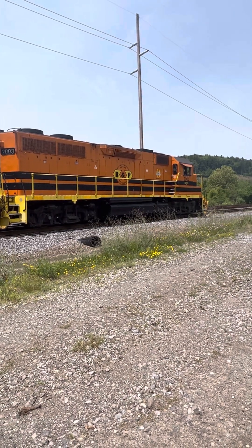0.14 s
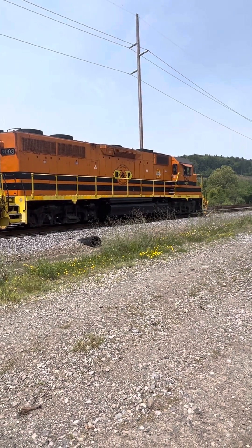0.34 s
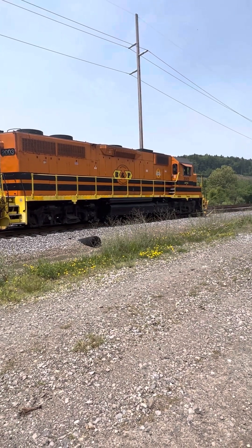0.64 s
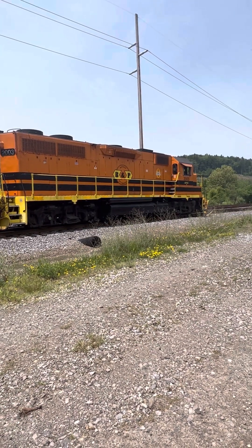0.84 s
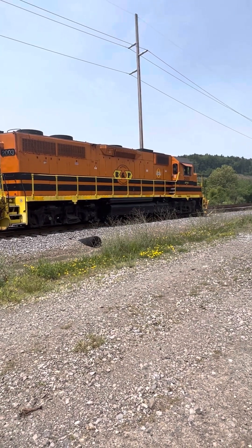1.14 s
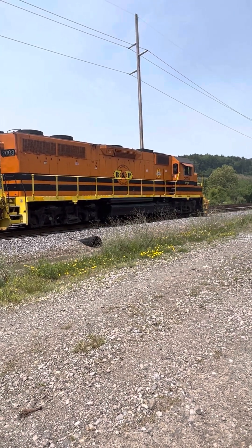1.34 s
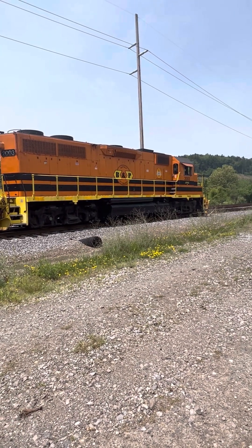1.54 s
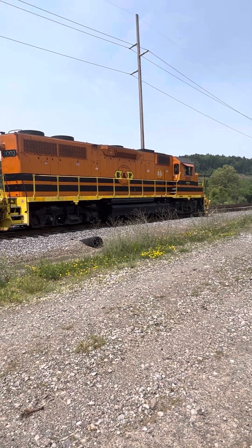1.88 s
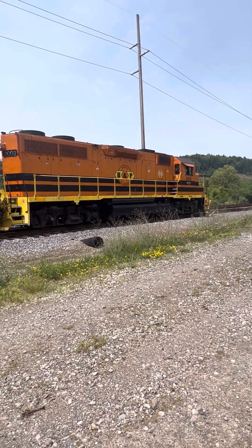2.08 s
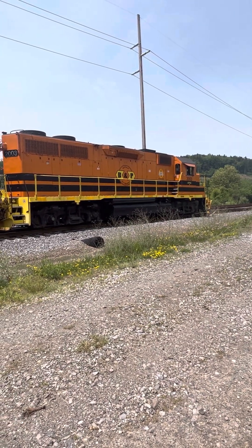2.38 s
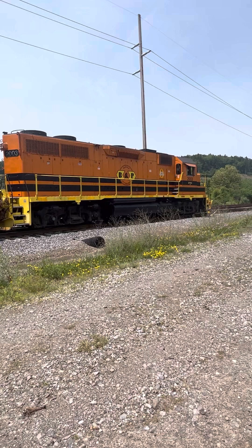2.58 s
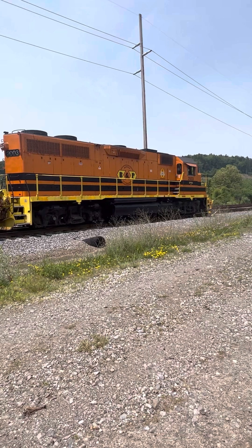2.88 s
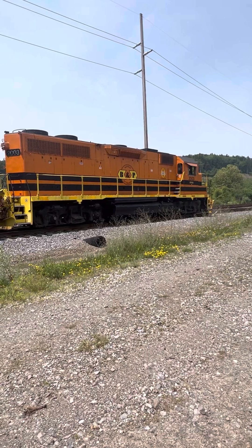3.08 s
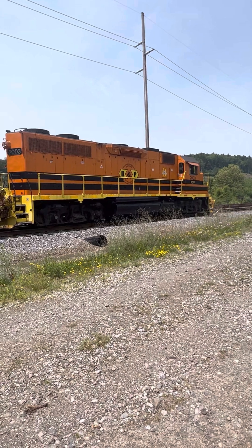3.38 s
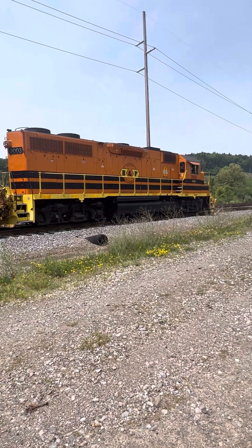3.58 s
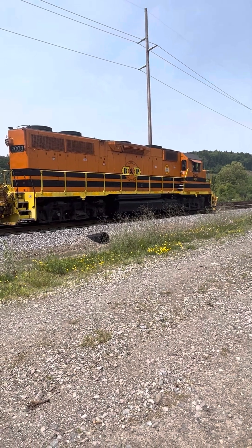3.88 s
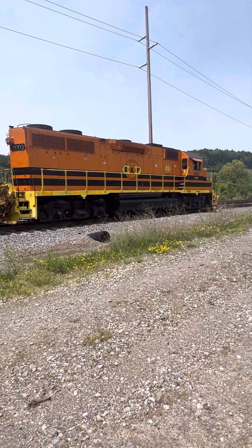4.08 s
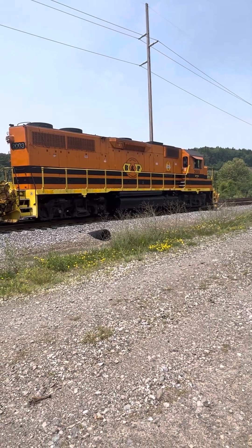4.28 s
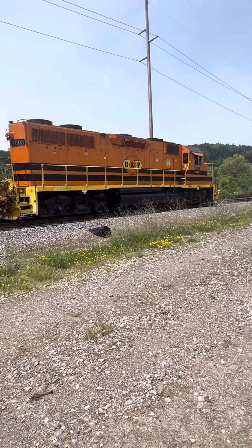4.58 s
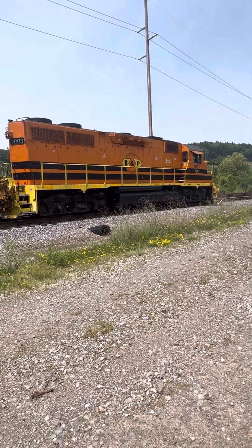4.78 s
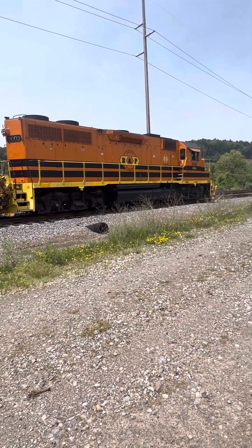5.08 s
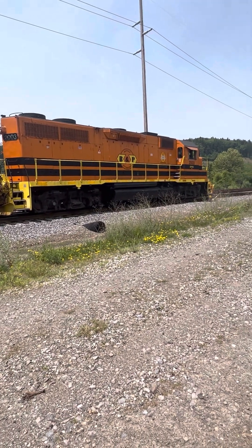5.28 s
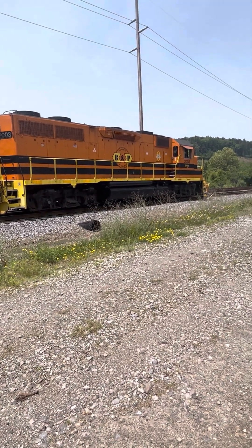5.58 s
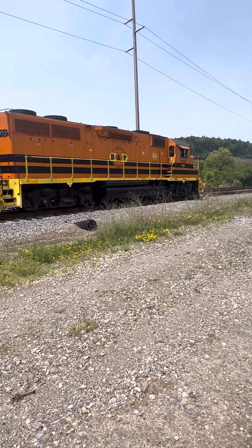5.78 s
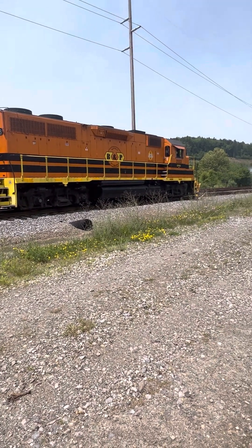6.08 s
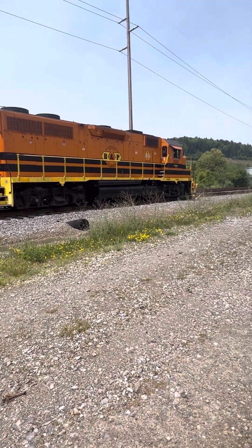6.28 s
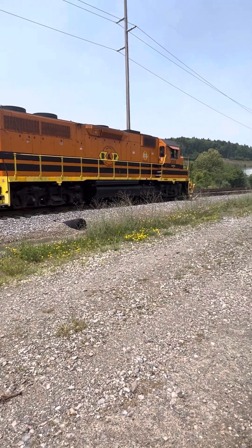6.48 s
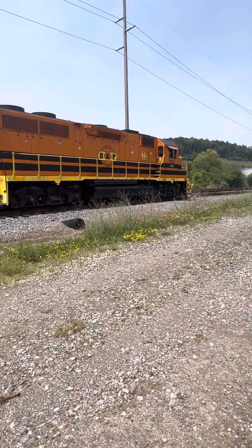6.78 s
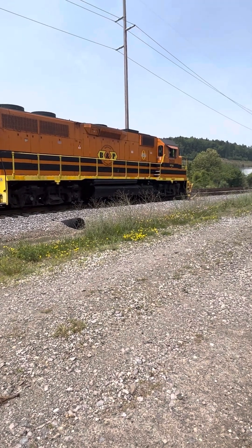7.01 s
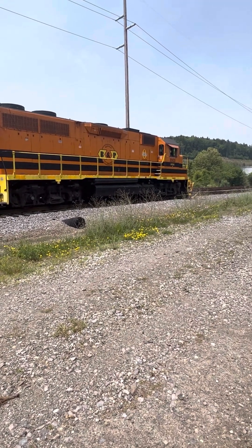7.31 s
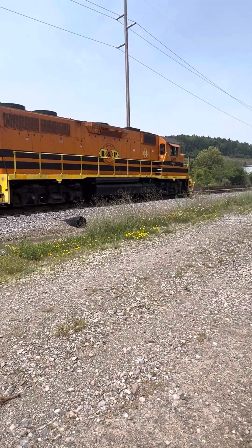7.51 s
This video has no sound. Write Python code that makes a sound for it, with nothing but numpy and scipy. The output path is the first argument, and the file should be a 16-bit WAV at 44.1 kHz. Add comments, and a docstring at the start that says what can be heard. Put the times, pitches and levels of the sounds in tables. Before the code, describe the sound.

Steady idle of a heavy railway engine in the open air, picked up by a small handheld stereo microphone. Low throbbing rumble and muffled knocking form a quick, uneven, looping pattern; gear tones hum above, panels rattle, fans hiss, and a small motor whines faintly. Around 4.9 seconds something bumps the microphone twice in quick succession, short and clicky. Afterwards the same idle goes on, chuffs easing slightly, with a faint squeal on top.

```python
"""Idling two-stroke diesel locomotive

Sixteen cylinders fire once a turn into the exhaust, unevenly, so the rumble throbs in a repeating pattern.
Shaped noise makes the block knock, hood rattle, air rumble and fan hiss; sine waves make the gears,
machines, squeal and a motor's whines. Something taps the microphone's casing twice, the second time
after a light touch: short clicks with a bending tone."""
import sys
import numpy as np
from scipy.fft import rfft, irfft, next_fast_len
from scipy.io import wavfile
from scipy.ndimage import map_coordinates

SR = 44100
rng = np.random.default_rng(int(sys.argv[2]) if len(sys.argv) > 2 else 0)


def waveform_to_disk(signal):
    """Save audio, clipped to [-1, 1], as 16-bit WAV at the path in sys.argv[1]."""
    frames = np.transpose(np.atleast_2d(signal))
    scaled = np.clip(frames, -1, 1) * 32767
    samples = np.round(scaled).astype(np.int16)
    wavfile.write(sys.argv[1], SR, samples)


N = 337365
TIME_S = np.arange(N) / SR
SHAFT_HZ = 3.7718  # average crankshaft turns a second


def amp(db):
    """Turn decibels into a plain multiplier."""
    return 10 ** (np.asarray(db) / 20)


def unit(x):
    """Scale a sound to an rms of 1."""
    return x / np.sqrt(np.mean(x ** 2) + 1e-20)


def along(points, hz):
    """Read a curve of (f/Hz, value) points on a log frequency axis."""
    f, value = np.transpose(points)
    return np.interp(np.log(hz + 1), np.log(f + 1), value)


def over_time(points):
    """Read a curve of (t/s, value) points at every sample."""
    return np.interp(TIME_S, *np.transpose(points))


def wobble(rate):
    """A smooth random curve with this many random knots a second."""
    coarse = np.arange(0, N + 32, 32)  # every 32nd sample is enough
    knots = rng.standard_normal(int(N * rate / SR) + 4)
    curve = map_coordinates(knots, [coarse * rate / SR])
    return np.interp(np.arange(N), coarse, curve)


def noise_pair():
    """Two unrelated white noises."""
    return rng.standard_normal((2, N))


def filtered(x, response):
    """Multiply the spectrum of x by a response, which may also shift phase."""
    m = next_fast_len(N + SR // 2)
    return irfft(rfft(x, m) * response(np.fft.rfftfreq(m, 1 / SR)), m)[..., :N]


def ports(hz):
    """The two microphone ports hear each frequency at different levels and moments."""
    # left level above right: f/Hz, level/dB
    lean = [(60, 0), (200, -1.5), (400, -2), (600, -5), (760, -4.5), (900, -1.6), (1800, -1.5),
            (2400, -0.5), (3200, 4), (3900, 1.5), (5500, 0), (7000, 0.5), (9000, 0)]
    # how far left leads right: f/Hz, phase/rad
    lead = [(30, -0.06), (70, 0), (150, 0), (500, 0), (950, 0.38), (1500, 0), (2300, 0), (3000, 1),
            (3700, 0.1), (4300, -1.5), (4800, -3), (5400, -4.5), (7000, -7), (8800, -6.5), (9700, -7.5),
            (11700, -12.5)]
    half = amp(along(lean, hz) / 2) * np.exp(.5j * along(lead, hz))
    return np.array([half, 1 / half])


def spread(pair, spectrum):
    """Colour two unrelated noises and mix them so left and right are partly alike; rms 1."""
    # left-right likeness: f/Hz, correlation (1 = the same)
    likeness = [(30, .995), (60, 1), (120, 0.99), (200, .99), (300, 1), (500, 0.95), (620, 0.97),
                (760, 0.93), (900, 0.96), (1200, 0.94), (2050, 0.99), (2500, .43), (3400, .2), (4000, .55),
                (4500, 0.17), (6500, 1), (8500, 0.54)]

    def mid_and_side(hz):
        turn = np.arccos(np.clip(along(likeness, hz), -1, 1)) / 2
        return amp(along(spectrum, hz)) * [np.cos(turn), np.sin(turn)]

    mid, side = filtered(pair, mid_and_side)
    return unit(np.array([mid + side, mid - side]))


def crank():
    """Turns of the shaft so far; the governor lets it run a little early or late."""
    return SHAFT_HZ * (TIME_S + .0003 * wobble(1))


def by_angle(turns, throb):
    """A level in dB that swells a whole number of times per turn."""
    return sum(db * np.cos(count * np.radians(turns * 360 - deg)) for count, db, deg in throb)


def sine_line(cycles, db, waver_db, rate):
    """A sine of rms level db that starts anywhere in its cycle and wavers in loudness."""
    level = np.sqrt(2) * amp(db + waver_db * wobble(rate))
    return level * np.sin(2 * np.pi * (cycles + rng.random()))


def air_rumble():
    """Turbulent air makes a low, random rumble."""
    # tone colour of air and frame: f/Hz, relative level/dB
    colour = [(10, -120), (18, -31), (28, -20), (42, -8.5), (60, -4.5), (85, -1), (107, 3), (130, -11.5),
              (190, -11.5), (240, -10.5), (330, -27), (500, -120)]
    return amp(-34.5) * spread(noise_pair(), colour)


def fan_hiss(turns):
    """Fans hiss as broad noise, swelling with the valve gear and flickering at random."""
    # tone colour: f/Hz, relative level/dB
    colour = [(1180, -31), (2000, -4.5), (3540, -16), (3990, -17), (4330, -16), (4430, -18), (5030, -22.5),
              (5980, -21.5), (7650, -25), (9510, -37), (10400, -35.5), (11200, -35), (12000, -50.5),
              (15600, -89.5), (22000, -120)]
    # swells per turn, depth/dB, crank angle of a crest/deg
    throb = [(2, .6, 62), (3, .35, 100), (4, .4, 70)]
    swell = amp(by_angle(turns, throb) + 0.67 * wobble(8) + 0.64 * wobble(40))
    return amp(-51) * spread(noise_pair() * swell, colour)


def late_hiss():
    """A thin band of noise joins late and then stays."""
    # tone colour: f/Hz, relative level/dB
    colour = [(4000, -40), (4600, 1), (5600, -3.5), (6600, 0), (7900, -5), (8700, -12), (9300, -50.5)]
    start_s, rise_s = 4.9, .25
    fade_in = np.clip((TIME_S - start_s) / rise_s, 0, 1)
    hiss = unit(filtered(noise_pair(), lambda hz: amp(along(colour, hz))))
    return amp(-66.5) * fade_in * hiss


def taps():
    """A dry click, and the casing flexes: one port is pushed as the other is pulled."""
    # t/s, click level/dB, click f/Hz, click time to fall 60 dB/s, noise per unit of tone,
    # flex level/dB, flex time to fall 60 dB/s (levels ahead of the soft onsets and the click filter)
    contacts = [(4.8784, -13.5, 2500, .0018, .4, -12.5, .016), (4.9088, -32, 3200, .003, 1, -34, .015),
                (4.9132, -32, 3600, .007, 3.5, -10, .028)]
    flex_hz = 510  # pitch the bend settles to
    click_lag_s = .00009  # the click reaches the left port later
    clicks, flex, t = np.zeros((2, N)), np.zeros(N), np.arange(SR // 25) / SR
    for s, db, hz, t60, crack, flex_db, flex_t60 in contacts:
        here = slice(round(s * SR), round(s * SR) + len(t))
        snap = np.sin(2 * np.pi * hz * t) + crack * rng.standard_normal((2, len(t)))
        clicks[:, here] += amp(db - 60 * t / t60) * (1 - np.exp(-t / .0002)) * snap
        # high bending waves arrive first, so the pitch starts high
        cycles = flex_hz * t + 1.5 * (1 - np.exp(-t / .0009))
        onset = 1 - np.exp(-(t / .0013) ** 2)
        flex[here] += amp(flex_db - 60 * t / flex_t60) * onset * np.sin(2 * np.pi * cycles)

    def click_path(hz):
        delay = np.exp(-2j * np.pi * hz * [[click_lag_s], [0]])
        return delay / (1 + 1j * hz / 4500) ** 2 / (1 + (hz / 10500) ** 8)

    return filtered(clicks, click_path) + flex * [[1], [-1]]


def motor():
    """The tone drifts with the motor's speed; switching mirrors it around the switching rate."""
    # a small switched motor, out of step at the two ports: t/s, tone f/Hz
    speed = [(0, 828.8), (.9, 829.3), (1.6, 827.3), (2.4, 828), (3.3, 831.8), (4, 833), (4.8, 829.8),
             (6, 831.7), (6.8, 827.2), (7.2, 826.3), (7.65, 827)]
    # multiple of the switching rate, multiple of the tone, left rms level/dB, right rms level/dB,
    # phase that left leads/rad (levels waver around these)
    whines = [(1, -1, -61.4, -71.4, -.6), (1, 1, -73, -71.5, -.7), (1, 3, -80, -82, -.7),
              (2, -1, -87, -85, -1.2), (2, 1, -95, -94, -2.1)]
    switch_hz = 5018.3
    start_db, creep_db_per_s = -47.5, .27  # the tone slowly grows louder
    tone = 2 * np.pi * np.cumsum(over_time(speed)) / SR
    tone_db = start_db + creep_db_per_s * TIME_S + 1.5 * wobble(20) + 2.2 * wobble(60)
    out = amp(tone_db) * np.sin(tone) * [[1], [-1]]
    for switch, side, left_db, right_db, lead in whines:
        phase = 2 * np.pi * switch * switch_hz * TIME_S + side * tone + .3 * wobble(40)
        whine_db = np.array([[left_db], [right_db]]) + 1.8 * wobble(30) + .4 * wobble(4)
        out = out + amp(whine_db) * np.sin([phase + lead, phase])
    return np.sqrt(2) * out  # sine peak from rms


def squeal():
    """Faint high sines with unsteady pitch; they come up late, then ease a little."""
    # f/Hz, rms level/dB ahead of the level curve
    pitches = [(6069, -82.5), (6497.5, -77), (6933, -81.5), (8087, -90)]
    # t/s, added level/dB
    loudness = [(0, -13), (2.8, -10), (6.4, -1.5), (7.65, -5)]
    lines = sum(sine_line(hz * TIME_S + 0.23 * wobble(6.5), db, waver_db=2.5, rate=4)
                for hz, db in pitches)
    return amp(over_time(loudness)) * lines


def machines():
    """Machines off the shaft hum as sines at their own fixed pitches."""
    # f/Hz, rms level/dB around which each wavers
    hums = [(39.7, -56), (61.63, -43), (77.06, -43), (86.05, -50), (106.8, -43), (142.4, -51), (224.3, -51),
            (257.8, -56)]
    return sum(sine_line(hz * TIME_S, db, waver_db=1.2, rate=1) for hz, db in hums)


def shaft_tones(turns):
    """Sines at whole multiples of the shaft speed: gear tones and one low exhaust note."""
    # steady hums locked to the shaft, one low exhaust note among the gear tones:
    # multiple of the shaft speed, rms level/dB around which all waver together
    steady_hums = [(10, -55), (33, -41), (39, -51), (40, -48), (42, -53), (45, -54), (48, -52), (49, -48),
                   (53, -53), (58, -53), (61, -53), (82, -54), (90, -57), (98, -57), (118, -56), (121, -56),
                   (142, -56), (145, -57), (154, -54), (257, -63), (259, -63), (286, -65), (317, -64),
                   (345, -66)]
    # gears whose teeth press unevenly: multiple of the shaft speed, level/dB ahead of swell and waver,
    # list of (swells per turn, depth/dB, crank angle of a crest/deg)
    loaded_gears = [(56, -47, [(1, 1.5, 91), (2, 3, 76), (3, 1.5, 89), (4, 2, 72)]),
                    (79, -44.5, [(3, 1.5, 93), (4, 1.2, 47), (6, 1.5, 10)]), (113, -50, [(1, 1.5, 216),
                    (5, 2, 41), (6, 1.2, 7)]), (158, -45.5, [(1, .8, 230), (2, 3.4, 48), (3, 4, 45),
                    (4, 3.4, 58)]), (187, -55, [(1, 3, 233), (3, 2.5, 108), (7, 2, 0)])]
    angle = np.arange(8192) / 8192
    one_turn = sum(np.sqrt(2) * amp(db) * np.sin(2 * np.pi * (order * angle + rng.random()))
                   for order, db in steady_hums)
    steady = np.interp(turns, angle, one_turn, period=1) * amp(wobble(3))
    loaded = sum(sine_line(order * turns, db + by_angle(turns, load), waver_db=1.2, rate=3)
                 for order, db, load in loaded_gears)
    return steady + loaded


def clatter(turns):
    """Raw combustion noise: part returns from turn to turn, slowly changing; part is new."""
    # f/Hz, share of the knock's power in the slowly changing, returning pattern
    repeats = [(140, .25), (200, .3), (300, .6), (450, .7), (600, .65), (720, .6), (1000, .3), (1600, .15),
               (2600, .0)]
    lasting = .35  # share of the returning pattern that never changes
    renew_turns = 3  # the rest is replaced over this many turns
    size = round(SR / SHAFT_HZ)
    age = np.abs(turns) / renew_turns
    old, angle = age.astype(int), (turns % 1 * (size - 1)).astype(int)
    fade = age % 1 * np.pi / 2
    patterns = rng.standard_normal((2, 30, size))
    changing = patterns[:, old, angle] * np.cos(fade) + patterns[:, old + 1, angle] * np.sin(fade)
    alike = np.sqrt(lasting) * patterns[:, -1, angle] + np.sqrt(1 - lasting) * changing
    share = lambda hz: np.clip(along(repeats, hz), 0, 1)
    returning = filtered(alike, lambda hz: np.sqrt(share(hz)))
    return returning + filtered(noise_pair(), lambda hz: np.sqrt(1 - share(hz)))


def hood(pair, turns):
    """The clatter shakes hood panels and louvres, which colour it and flicker in level."""
    # tone colour: f/Hz, relative level/dB
    colour = [(510, -38), (860, -11.5), (948, 3), (1030, -2), (1210, 0.5), (1420, -8), (1890, -9),
              (2320, -33), (2600, -15.5), (3380, -38.5), (5720, -120)]
    # swells per turn, depth/dB, crank angle of a crest/deg
    throb = [(1, .5, 195), (4, .3, 70), (6, .3, 56)]
    swell = amp(by_angle(turns, throb) + 0.36 * wobble(5) + 0.64 * wobble(45))
    return amp(-43) * spread(pair * swell, colour)


def block(pair, turns):
    """The engine block colours the clatter; bass thuds, middle knock and top chuffs throb apart."""
    # tone colour: f/Hz, relative level/dB
    colour = [(90, -120), (120, -14), (145, -1.5), (167, -6), (215, -3), (260, -14.5), (305, -10.5),
              (345, -11), (430, -9), (475, -10.5), (550, -7.5), (600, -10.5), (650, -10.5), (715, -8.5),
              (780, -17), (835, -31.5), (900, -27), (1100, -120)]
    # the three throbs: swells per turn, depth/dB, crank angle of a crest/deg
    thud_throb = [(1, .7, 28), (2, .8, 89), (3, 1.1, 100), (4, 1.6, 72), (5, .8, 69)]
    knock_throb = [(1, 1.2, 220), (2, .5, 45), (4, .4, 55), (5, .5, 42), (6, .5, 8)]
    chuff_throb = [(1, 3.4, 235), (2, 1.2, 50), (3, .8, 105), (7, 1.7, 1), (8, 1.5, 28)]
    # exhaust chuffs over time: t/s, relative level/dB
    chuff_level = [(0, -1), (4.9, -1), (5.2, -2.5), (7.65, -4)]
    chuff_db = by_angle(turns, chuff_throb) + over_time(chuff_level)
    above = lambda hz, edge_hz: 1 / (1 + (edge_hz / (hz + 1)) ** 24)  # steep band edge
    thud = filtered(pair * amp(by_angle(turns, thud_throb)), lambda hz: 1 - above(hz, 300))
    knock = filtered(pair * amp(by_angle(turns, knock_throb)), lambda hz: above(hz, 300) - above(hz, 680))
    chuff = filtered(pair * amp(chuff_db), lambda hz: above(hz, 680))
    return amp(-32.5) * spread(thud + knock + chuff, colour)


def exhaust(turns):
    """One pulse per cylinder and turn rings the pipe; the open stack radiates no deep bass."""
    # crank angle at which the pulse leaves the stack/deg, pulse level/dB
    cylinders = [(20.4, -4.1), (26.7, 3.8), (69.3, 4.0), (77.4, 0.5), (95.9, -4.2), (124.2, -4.3),
                 (146.8, -4.2), (170.4, 4.1), (194.4, -2.0), (218.3, 1.3), (241.5, 3.6), (264.8, 3.6),
                 (287.8, 4.1), (295.0, 0.4), (332.1, -3.8), (340.1, 4.3)]
    # resonances of manifold and stack: f/Hz, width/Hz, level/dB
    resonances = [(30.2, 3.1, -58.0), (72.5, 23.9, -39.1), (78.2, 12.7, -35.2), (104.6, 3.9, -53.0),
                  (139.5, 4.2, -52.2)]
    order = np.arange(1, 38)  # harmonics of the shaft speed
    hz = order * SHAFT_HZ
    pulses = sum(amp(db) * np.exp(-2j * np.pi * order * deg / 360) for deg, db in cylinders)
    pipe = 0
    for k, (centre, width, db) in enumerate(resonances):
        ring = 1j * hz * width / (centre * centre - hz * hz + 1j * hz * width)
        pipe = pipe + (-1) ** k * amp(db) * ring  # neighbours have opposite signs
    s = 1j * hz / 27  # bass falls away below about 27 Hz
    stack = s ** 4 / ((s * s + .7 * s + 1) * (s * s + 1.4 * s + 1))
    size = 4096  # samples in one stored turn
    one_turn = irfft(np.r_[0, pulses * pipe * stack] * size / 2, size)
    return np.interp(turns, np.arange(size) / size, one_turn, period=1) * amp(0.69 * wobble(7.4))


def scene():
    """The engine's layers share one shaft and reach both ports; motor and taps are already stereo."""
    turns = crank()
    pair = clatter(turns)
    air = air_rumble() + fan_hiss(turns) + late_hiss()
    tones = squeal() + machines() + shaft_tones(turns)
    engine = air + tones + hood(pair, turns) + block(pair, turns) + exhaust(turns)
    return filtered(engine, ports) + motor() + taps()


def record(dry):
    """The microphone chain cuts off steeply above its band limit."""
    top_hz = 12100
    return filtered(dry, lambda hz: 1 / (1 + (hz / top_hz) ** 60))


dry = scene()
out = record(dry)
waveform_to_disk(out)
```